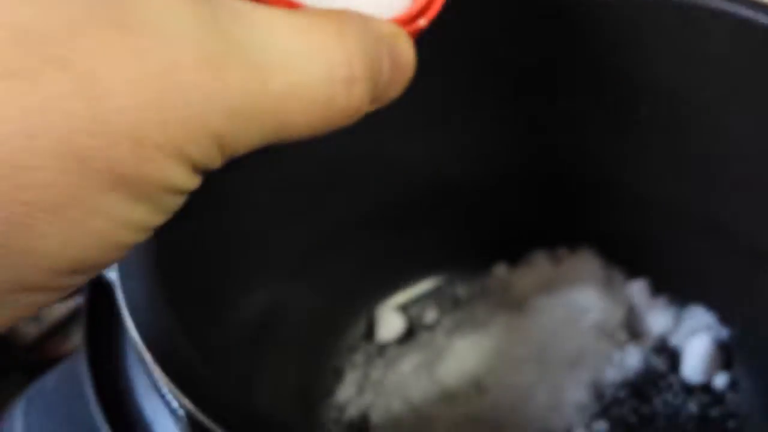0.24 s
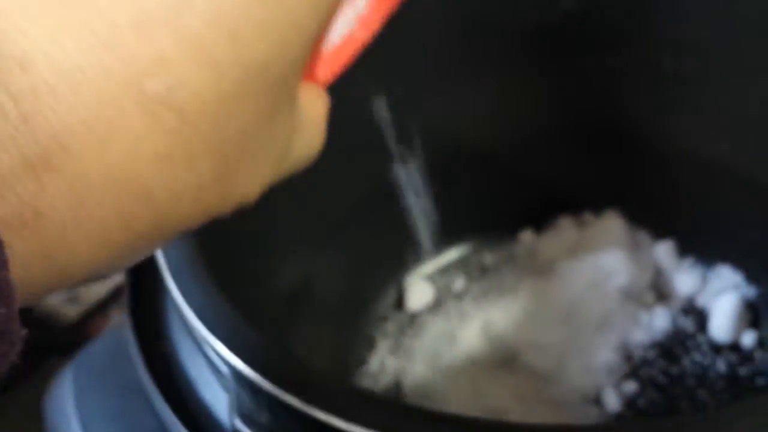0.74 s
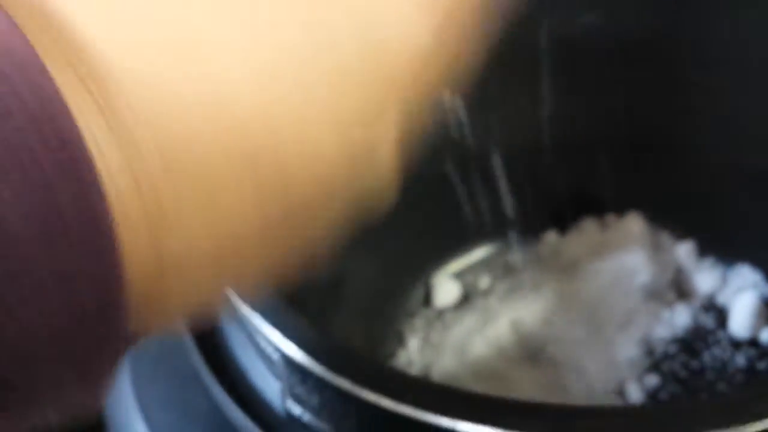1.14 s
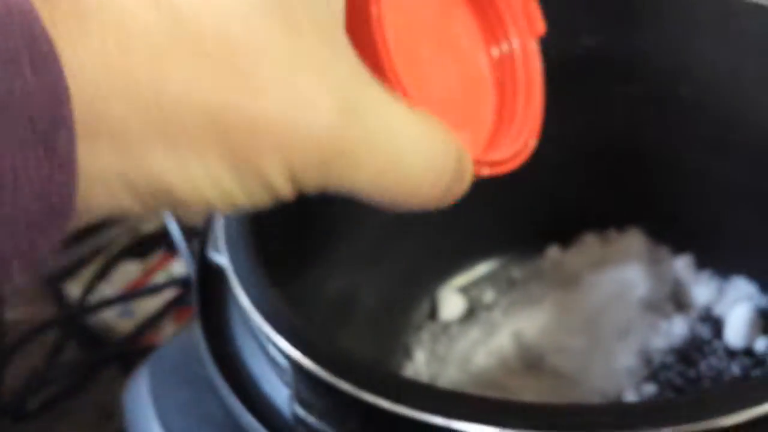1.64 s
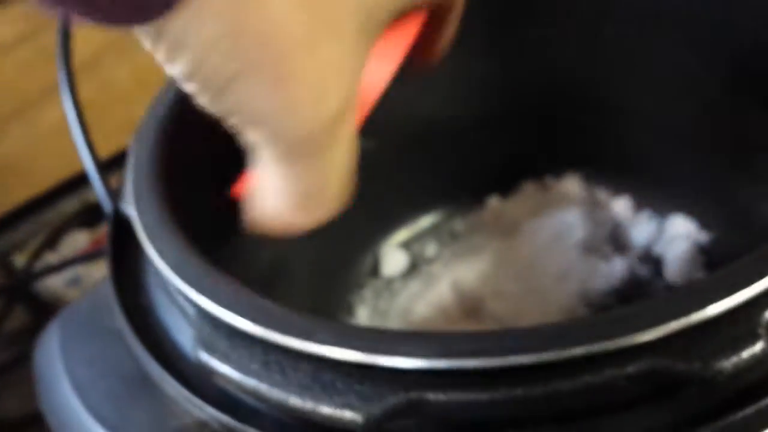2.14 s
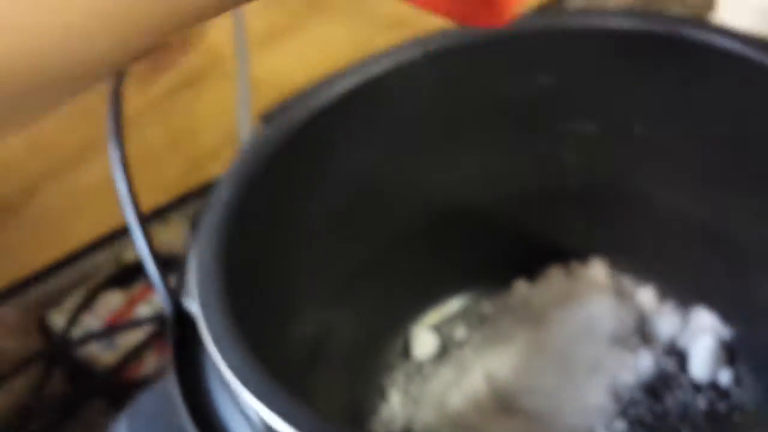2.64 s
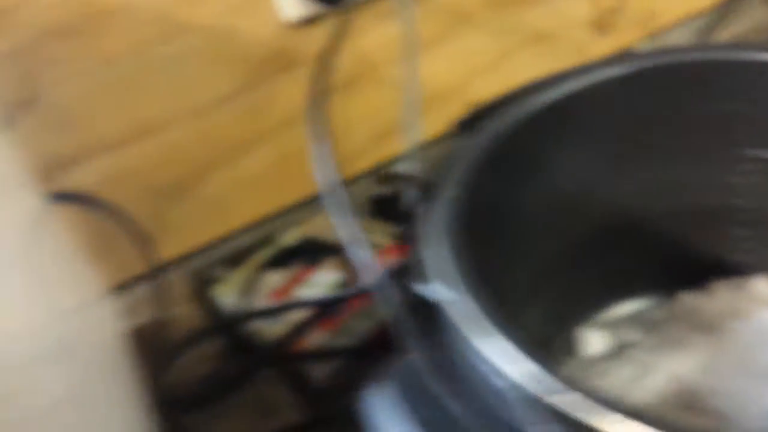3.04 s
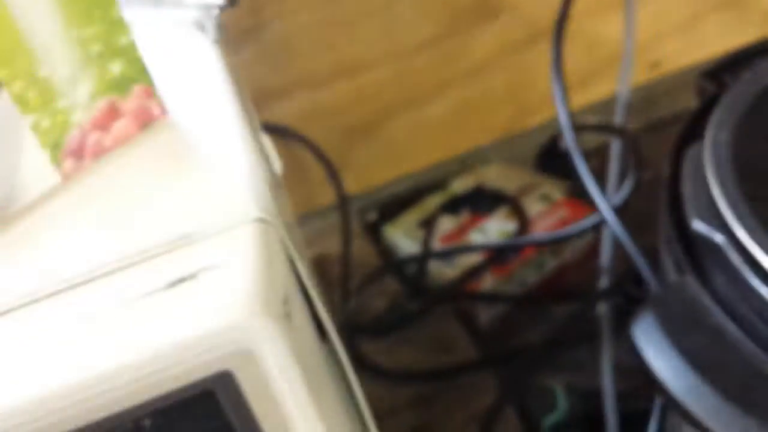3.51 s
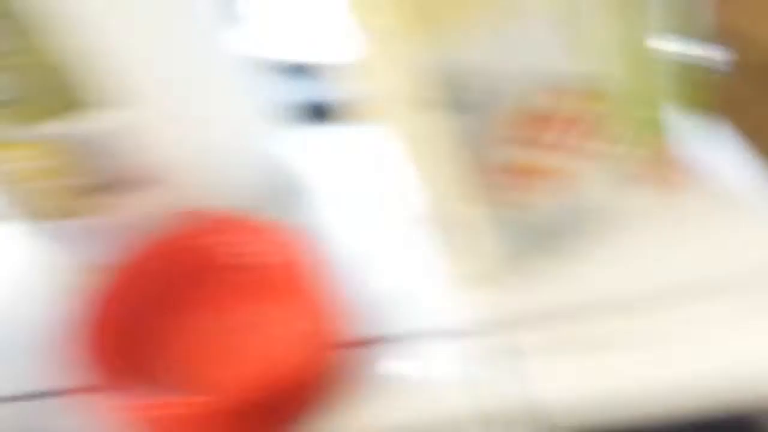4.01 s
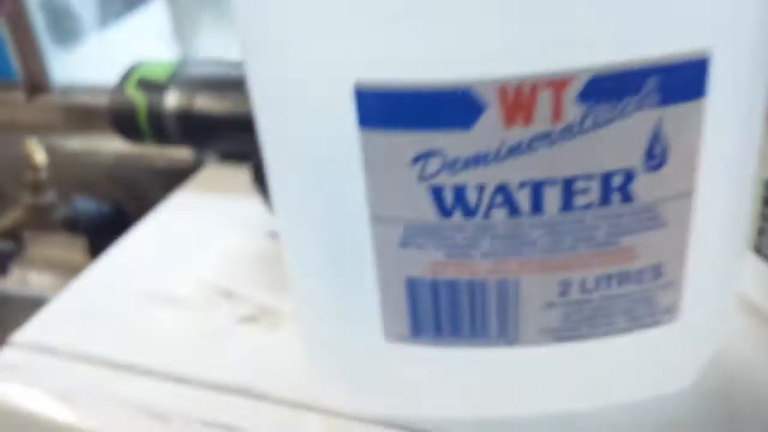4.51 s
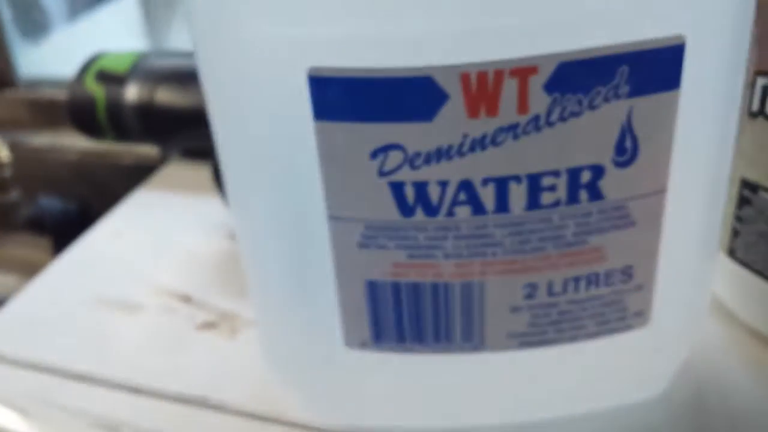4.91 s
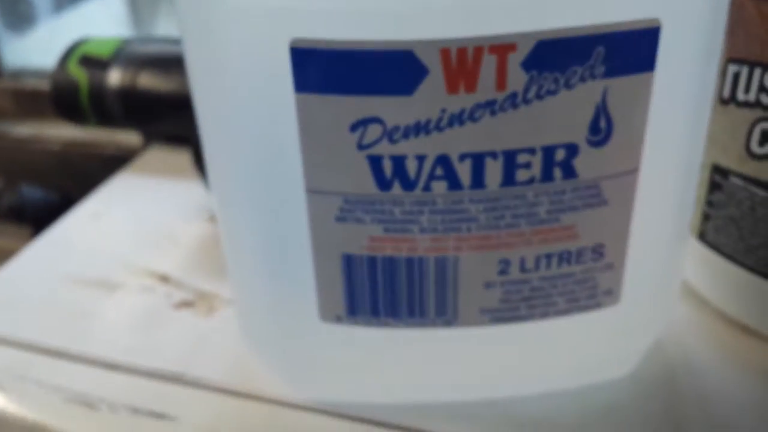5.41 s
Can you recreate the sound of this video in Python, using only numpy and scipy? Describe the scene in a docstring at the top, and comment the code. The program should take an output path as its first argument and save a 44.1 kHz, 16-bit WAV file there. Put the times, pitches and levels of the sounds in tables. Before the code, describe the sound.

Close, slightly rough hand-held stereo pickup in a small indoor room, with low rumble, faint hiss and a short diffuse echo. From 0 to 1.1 s dry granules slide off a plastic cap into a metal pot: crisp high ticks, mostly left, and short sandy swells, with a strong snap near 0.86 s. Finger rustle and a few light scrapes continue to 2 s. At 2.04, 2.25 and 2.43 s the cap raps the pot rim: very loud, hard cracks with rattling plastic and bright, short metallic ringing, plus dull bumps between. The background sinks almost to silence. At 3.33 s the light cap drops on a counter with a sharp clack, clattering in a quick cluster, then weaker rocking taps at 3.5-3.75 s over short woody low tones. From 4 s faint rubbing, a click at 4.6 s, then low handling thuds, rustle and firm snaps around 4.8-5.6 s as rumble returns.

```python
"""Granules tipped into a pot

A hand tips granules from a plastic cap into a metal pot, raps the cap three times on the rim and drops it on a
counter; fingers rustle, click and bump near a hand-held phone. The rumble sinks after the loud raps and slowly
returns. Raps and drop mix noise bursts with ringing modes; bumps are decaying sines with narrow noise; ticks and
rustle are filtered noise, over a short diffuse echo, rumble and hiss. All reaches two ports, left and right."""
import sys
import numpy as np
from scipy import signal
from scipy.fft import rfft, irfft
from scipy.io import wavfile
from scipy.ndimage import uniform_filter1d

SR = 44100
rng = np.random.default_rng(int(sys.argv[2]) if len(sys.argv) > 2 else 0)


def transcribe(signal):
    """Save signal, clipped to [-1, 1], as a 16-bit WAV file at the path in sys.argv[1]."""
    frames = np.atleast_2d(signal).T
    limited = np.clip(frames, -1, 1)
    pcm = np.round(limited * 32767).astype(np.int16)
    wavfile.write(sys.argv[1], SR, pcm)


N = 249606
T = np.arange(N) / SR  # s

# Cap on the rim: t/s, crack peak level/dB, rim ring level/dB and wall ring level/dB against the crack,
# freedom to ring/0-1, treble left minus right/dB
RAPS = [(2.041, 0.5, -12, -21, 0.71, 10), (2.252, -6, -14, -19.5, 0.44, 8),
        (2.43, -3, -13, -21.5, 0.81, 4.5)]
# Modes of the metal pot: f/Hz, relative level/dB, undamped t60/s
POT_MODES = [(269, -16, .55), (711, -14, .25), (983, -5, .2), (1206, -15, .35), (1254, -12, .2),
             (1497, -9, .22), (1890, -16, .33), (2223, -18, .3), (2680, -16, .3), (2950, -7, .13),
             (3255, -3, .24), (3530, -3, .33), (3632, -5, .35), (3770, -3, .2), (3898, -1, .16),
             (4050, -10, .25), (4315, -2, .17), (4405, -11, .24), (4790, -3, .2), (5082, -5, .13),
             (5355, -1, .18), (5530, -10, .3), (5700, -10, .3), (5911, -11, .3), (6028, -2, .17),
             (7250, -18, .25)]
# Colour of the rap's crack: f/Hz, relative level/dB per Hz
CRACK_COLOUR = [(180, -44.5), (300, -20), (523, -23.5), (975, -15), (1730, -20), (2480, -15), (2920, -16.5),
                (3220, 0.5), (4540, -10), (5900, -8.5), (6840, -18.5), (11400, -26), (15000, -49)]

# Cap landing and rocking: t/s, clatter peak level/dB, counter level/dB against the clatter, clatter tail t60/s
BOUNCES = [(3.324, -15.5, -14.5, 0.16), (3.328, -11.5, -24, 0.074), (3.335, -14, -31, 0.13),
           (3.343, -14.5, -20, 0.24), (3.351, -11, -20.5, 0.23), (3.36, -20, -16, 0.39),
           (3.518, -26.5, -9.5, 0.16), (3.526, -18, -17.5, 0.33), (3.539, -15, -28, 0.071),
           (3.555, -25, -20, 0.026), (3.613, -21, -11, 0.13), (3.647, -21, -14, 0.2),
           (3.739, -40.5, -2, 0.12)]
# Modes of the counter: f/Hz, relative level/dB, t60/s
COUNTER_MODES = [(114.4, -14, 0.33), (162.6, -3.5, 0.39), (311.6, -1, 0.35), (375, -10.5, 0.47),
                 (646, 3.5, 0.051), (912, 4.5, 0.053)]
# Colour of the clattering cap: f/Hz, relative level/dB per Hz
CAP_COLOUR = [(150, -17), (400, -3), (1200, 1.5), (2500, -2.5), (4200, 0.5), (5600, 4), (7200, -3.5),
              (10000, -14), (15000, -45.5)]
# Tail against the strike/dB, mean treble left minus right/dB and its spread/dB
BOUNCE_TAIL_DB, BOUNCE_LEFT_DB, BOUNCE_SCATTER_DB = -8.5, 4, 6

# Single ticks and snaps: t/s, main band peak level/dB, then dull, body and bright level/dB against the main band,
# treble left minus right/dB
TICKS = [(0.0671, -19, -5, -49, -8, 37), (0.086, -24, -19, -37, -7, 29), (0.1258, -23, -1.5, -32, -9, 24),
         (0.136, -36, 1, 11, -12, 16), (0.169, -17.5, -8, -28, -12, 32), (0.206, -24, -30, -22, -4, 24),
         (0.2179, -14.5, -15, -39, -5, 31), (0.486, -22, -14.5, -32, -13, 25),
         (0.5119, -17.5, -26, -17, -8, 18), (0.532, -22, -38, -25, -10, 4),
         (0.5412, -12.5, -35, -34, -17, 23), (0.548, -21, -31, -28, -29, 19),
         (0.5648, -15.5, -36, -31, -31, 18), (0.5805, -17, -38, -22, -4.5, 19),
         (0.6047, -16.5, -32, -30, -37, 16), (0.6244, -25.5, -16, -10, -12, 18),
         (0.6558, -19.5, -12, 2.5, 5, 9), (0.7, -30, -20, -16, -24, -2), (0.8306, -14.5, -13.5, -5, 2.5, 6),
         (0.856, -6, -24, -11.5, -12, 2), (0.95, -23.5, -28, -12, 1, 18), (0.973, -26, -22, -13, -32, 16),
         (0.9896, -21.5, -21, -5, -30, 10), (1.039, -28, -25, -20, -1, 9),
         (1.072, -26.5, -14.5, -19, -30, 22), (1.224, -26.5, -11, -2, -31, 6),
         (1.5264, -33.5, -29, -27, -23, 11), (2.612, -36, -17.5, -19.5, -32, 12),
         (2.786, -53.5, -15.5, -25, -17.5, -14), (3.3258, 2.5, -23, -6.5, -9.5, 0.5),
         (3.958, -47, -20.5, -13, -4, 2), (3.9867, -30.5, -25, -17, -28, -1), (4.5456, -39, -20, -16, 2, 3),
         (4.6, -18, -18.5, -6.5, 0, 3.5), (4.684, -41.5, -16, -17, -29, 3),
         (4.7873, -14.5, -13, -9, -47, 12), (4.8182, -24, 3.5, -7, -21, -1),
         (4.9674, -9, -6.5, -40, -38, 11), (5.0667, -25.5, -10, -16, -13, 14),
         (5.1368, -5, -8, -1, -17.5, 26), (5.311, -5, -12.5, -6.5, -14, 37),
         (5.497, -24, -11, -31, -15, 14), (5.587, -15, -8, -16, -20, 33), (5.5928, -24, -3.5, -23, -30, 27)]
TICK_TAIL_DB, TICK_T60_S = -13, 0.035  # tail against the click

# Colour of granules, fingers and ticks: f/Hz, relative level/dB per Hz
GRAIN_COLOUR = [(590, -19.5), (1000, -26.5), (1110, -23.5), (2260, -21), (3290, -16.5), (4310, -16),
                (5110, -6.5), (5410, -6.5), (5730, -6.5), (6710, -18), (11800, -30.5), (15000, -37)]
# Dull, body, main and bright bands: low edge f/Hz, high edge f/Hz
BANDS = [(800, 2900), (2300, 4700), (4000, 8500), (7500, 15000)]
# Swells of granules sliding off the cap: peak t/s, peak level/dB, rise/s, fall/s, dullness level/dB
GRANULES = [(.092, -50.5, 0.068, 0.053, 8), (.176, -38, 0.11, 0.084, -3.5), (.214, -29, 0.029, 0.024, -12),
            (.498, -45.5, 0.16, 0.056, -8), (.548, -27, 0.056, 0.064, -28), (.604, -39, 0.0068, 0.1, -13),
            (.66, -28.5, 0.0088, 0.013, -12), (.68, -46, 0.022, 0.25, -9), (.783, -35.5, 0.01, 0.033, -6.5),
            (.836, -33, 0.0082, 0.019, -10), (.892, -28, 0.0052, 0.017, -16),
            (.806, -34.5, 0.029, 0.0065, -13), (.87, -34.5, 0.039, 0.088, -14),
            (.98, -40.5, 0.23, 0.067, -11.5), (1.042, -43, 0.045, 0.014, -21),
            (1.068, -42.5, 0.026, 0.061, -14)]
# Swells of fingers rubbing cap and phone, and of the cap scuffing the counter: columns as for the granules
FINGERS = [(1.235, -47, .03, 0.052, -7), (1.399, -31.5, 0.014, 0.022, -16), (1.6, -45.5, 0.011, .2, -19),
           (1.691, -45, 0.085, 0.059, -2), (1.788, -41.5, 0.1, 0.043, -6.5), (1.9, -48.5, 0.02, 0.11, -11),
           (1.981, -42, 0.22, 0.026, -10.5), (3.58, -46.5, 0.11, 0.12, -1), (3.64, -41.5, 0.12, 0.05, -5.5),
           (3.982, -48, 0.0074, 0.063, -5), (4.005, -50.5, 0.03, 0.052, -7.5),
           (4.132, -52, 0.078, 0.03, -7.5), (4.349, -42.5, 0.12, 0.026, -7),
           (4.552, -57.5, 0.028, .023, -13.5), (4.694, -61, 0.024, 0.048, -3.5),
           (4.793, -30.5, .012, 0.024, -9), (4.856, -44, .11, .063, -7.5),
           (4.965, -37.5, 0.051, 0.058, -10), (5.068, -47, 0.0074, 0.03, -9),
           (5.145, -35, 0.041, 0.082, -2.5), (5.22, -31.5, 0.041, 0.036, -8.5),
           (5.284, -33.5, 0.1, 0.01, -9), (5.323, -38, 0.04, 0.091, -4), (5.503, -31, 0.0077, 0.09, -5),
           (5.53, -34.5, 0.074, 0.041, -5.5), (5.557, -34, 0.061, 0.023, -3.5), (5.6, -48, 0.049, 0.013, 4)]
# Dull and body level/dB on top of the dullness, bright level/dB, lean left minus right/dB before the side weights
GRANULE_MIX_DB, FINGER_MIX_DB = (-3, 3.5, -4.5, 11), (-3, 2, -10, 11)
# Faint rub under the swells, rising and falling, inaudible from the raps until after the drop: t/s, level/dB
RUB = [(0.0, -57), (0.27, -58), (0.41, -65), (1.0, -49.5), (1.5, -58.5), (2.0, -60), (2.042, -100),
       (3.8, -85), (4.06, -55.5), (4.19, -76), (4.452, -62), (4.76, -72), (4.9, -68), (5.4, -53),
       (5.58, -58), (5.66, -77)]
# Shares of the rub: dull, body and bright level/dB against the main band
RUB_SHARES_DB = (-9, -6, -2.5)
SWELL_CURVE, RUB_LEFT_DB = 1.02, 8  # 1 = straight slopes in dB; lean left minus right before the side weights

# Granules stirring the pot's air: start t/s, end t/s, centre f/Hz, width f/Hz, level/dB
STIRS = [(0.453, 0.55, 875, 120, -64), (0.585, 0.726, 233, 70, -60), (0.805, 0.88, 990, 100, -61),
         (0.822, 1.091, 241, 59, -49), (1.096, 1.3, 237, 69, -56), (1.372, 1.423, 920, 120, -56.5),
         (1.484, 1.527, 930, 120, -57.5), (1.616, 1.788, 920, 102, -58.5)]
# Dull bumps through the phone's case: t/s, peak level/dB, pitch f/Hz, t60/s
BUMPS = [(0.649, -31.5, 222, 0.089), (0.826, -46, 230, 0.22), (2.086, -24, 177.2, 0.14),
         (2.108, -33.5, 229, 0.15), (2.145, -31.5, 253, 0.088), (2.165, -33.5, 264, 0.071),
         (2.205, -31.5, 193, 0.12), (2.232, -63, 251, 0.42), (4.797, -32, 134, 0.14),
         (4.819, -42.5, 155, 0.41), (5.147, -30.5, 120, 0.36), (5.165, -41.5, 320, 0.16),
         (5.218, -38, 136.4, 0.43)]

# Background over time: t/s, rumble level/dB, hiss level/dB
ROOM = [(0.0, -58.5, -56.5), (0.47, -54, -63.5), (0.9, -49.5, -56), (1.4, -55.5, -59), (2.03, -58.5, -62.5),
        (2.24, -56, -81), (2.43, -63, -68), (2.63, -71.5, -75.5), (2.79, -77, -76.5), (3.3, -78, -75.5),
        (3.55, -70, -51.5), (3.962, -67.5, -75), (4.15, -62.5, -69.5), (4.701, -65.5, -64.5),
        (4.84, -45.5, -59.5), (4.96, -49.5, -55), (5.19, -56.5, -57), (5.66, -53, -58.5)]
# Colour of the rumble: f/Hz, relative level/dB per Hz
RUMBLE_COLOUR = [(15, -42), (25, -2.5), (81, 5), (181, -1), (229, -4), (330, -20), (461, -15), (545, -25),
                 (700, -21), (910, -48.5), (1540, -120)]
# Colour of the hiss: f/Hz, relative level/dB per Hz
HISS_COLOUR = [(120, -18.5), (200, -0.5), (320, 2), (494, -3.5), (1220, -6), (2510, -8.5), (4160, -8),
               (5550, -5.5), (10500, -12.5), (13700, -25), (15000, -43)]
AIR_DB = -12  # thin top of the hiss, below the hiss level
KITCHEN_T60_S, KITCHEN_DB = 0.3, -13

# Difference in colour between the ports: f/Hz, left minus right level/dB
PORTS = [(60, 1.94), (380, 0.1), (800, -2), (1500, 5.5), (2400, -1.4), (4300, 6), (8000, 0.5),
         (14700, -4.5)]
TOP_HZ = 14900


def undb(db):
    """Gain of a level in dB."""
    return 10 ** (np.asarray(db) / 20)


def unit(x):
    """Scale to an RMS of one."""
    return x / np.sqrt(np.mean(x ** 2))


def peak(x):
    """Scale to a peak of one."""
    return x / np.abs(x).max()


def colour(x, points):
    """Causal filter through (f/Hz, level/dB) points, by way of the cepstrum."""
    hz, db = np.transpose(points)
    f = np.maximum(np.fft.rfftfreq(4096, 1 / SR), 1)
    log_gain = np.interp(np.log(f), np.log(hz), db) * np.log(10) / 20
    cepstrum = irfft(log_gain)
    cepstrum[1:2048] *= 2  # folding it forward gives minimum phase
    cepstrum[2049:] = 0
    impulse = irfft(np.exp(rfft(cepstrum)))
    return signal.fftconvolve(x, impulse)[:len(x)]


def band(x, lo_hz, hi_hz):
    """Gentle band-pass."""
    return signal.sosfilt(signal.butter(2, [lo_hz, hi_hz], "band", fs=SR, output="sos"), x)


def walk(rate):
    """Random levels held 1 / rate s and slewed twice."""
    k = int(SR / rate)
    steps = np.repeat(rng.standard_normal(N // k + 1), k)
    return 1.6 * uniform_filter1d(uniform_filter1d(steps, k), k)[:N]


def fade(t, t60, rise=0.001):
    """Soft onset with time constant rise (s), then a 60 dB decay in t60 (s)."""
    return (1 - np.exp(-t / rise)) * np.exp(-np.log(1000) * t / t60)


def ring(t, modes, scatter_db, beats):
    """Decaying modes that waver, as close pairs do; high modes reach the ports out of step."""
    out = np.zeros((2, len(t)))
    for hz, db, t60 in modes:
        gain = undb(db + scatter_db * rng.standard_normal())
        turn = rng.random((2, 1)) * min(hz / 2500, 1)  # cycles
        points = rng.standard_normal(64) + 1j * rng.standard_normal(64) + 1.5
        waver = np.interp(t * beats, np.arange(64), points)  # beats = new points per second
        out += gain * np.imag(waver * np.exp(2j * np.pi * (hz * t + turn))) * fade(t, t60)
    return peak(out)


def pair(x, pan_db, lag):
    """One sound at two ports: the case shades only the treble, and the left port hears it lag samples late."""
    low = signal.sosfilt(signal.butter(1, 1200, fs=SR, output="sos"), x)
    treble = x - low
    left, right = undb(np.array([pan_db, -pan_db]) / 2) / np.cosh(pan_db * np.log(10) / 40)  # sum to two
    return np.array([np.roll(low + left * treble, lag), low + right * treble])


def add(out, s, x):
    """Mix a two-port sound in at s seconds."""
    i = int(s * SR)
    out[:, i:i + x.shape[1]] += x[:, :N - i]


def raps():
    """A 5 ms crack, rattling chatter of the cap, then the pot's rim and wall ring; a resting hand damps them."""
    out, t = np.zeros((2, N)), T[:30000]
    wall = [m for m in POT_MODES if m[0] < 2400]
    rim = [m for m in POT_MODES if m[0] > 2400]
    rim_lean = undb(np.array([[3.0], [-3.0]]))  # the rim's high modes favour the left port
    for s, db, rim_db, wall_db, free, pan_db in RAPS:
        rattle = undb(2.0 * np.repeat(rng.standard_normal(len(t) // 100), 100))
        contact = 1 / (1 + (t / .0055) ** 4)
        crack_level = contact * fade(t, 0.15)
        chatter_level = 0.11 * rattle * fade(t, 0.51 * free)
        burst = rng.standard_normal(len(t)) * (crack_level + chatter_level)
        crack = pair(peak(colour(burst, CRACK_COLOUR)), pan_db, lag=6)
        metal = undb(rim_db) * rim_lean * ring(t, rim, 0.93, 33.0)
        metal = metal + undb(wall_db) * ring(t, wall, 0.92, 20)
        damping = np.exp(-t * 30 * (1 - min(free, 1)))
        add(out, s, undb(db) * (crack + metal * damping))
    return out


def bounces():
    """The light cap clatters in gritty bursts; the counter answers with short low modes."""
    out, t = np.zeros((2, N)), T[:20000]
    for s, db, board_db, t60 in BOUNCES:
        grit = undb(3.0 * np.repeat(rng.standard_normal(len(t) // 40), 40))
        tail_level = undb(BOUNCE_TAIL_DB) * grit * fade(t, max(t60, .01))
        burst = rng.standard_normal(len(t)) * (fade(t, 0.007) + tail_level)
        burst[20] += 3.0  # the first contact is one hard pulse
        pan_db = BOUNCE_LEFT_DB + BOUNCE_SCATTER_DB * rng.standard_normal()
        clatter = pair(peak(colour(burst, CAP_COLOUR)), pan_db, lag=16)
        board = undb(board_db) * ring(t, COUNTER_MODES, 1.6, 45.6)
        add(out, s, undb(db) * (clatter + board))
    return out


def ticks():
    """A sharp click and a short noisy tail, split into bands with their own peaks."""
    out, t = np.zeros((2, N)), T[:6000]
    for s, db, dull_db, body_db, bright_db, pan_db in TICKS:
        level = fade(t, 0.0074, .0001) + undb(TICK_TAIL_DB) * fade(t, TICK_T60_S)
        burst = rng.standard_normal(len(t)) * level
        burst[8] += 4.0  # the first contact is one hard pulse
        burst = colour(burst, GRAIN_COLOUR)
        shares_db = (dull_db, body_db, 0, bright_db)
        tick = sum(undb(share) * peak(band(burst, *edges)) for share, edges in zip(shares_db, BANDS))
        add(out, s, undb(db) * pair(tick, pan_db, lag=5))
    return out


def rustle():
    """Dense grains of uneven size over a smooth rub, in four bands that share the grains."""
    hit, size = rng.random(N), rng.exponential(1, N)
    sign, rub, other = rng.standard_normal((3, N))
    struck = hit < 1800 / SR  # 1800 grains per second on average
    grains = unit(struck * sign * undb(3.3 * np.minimum(size, 3)))
    flicker = undb(1.5 * walk(60))
    out = []
    for side, smooth in ((0.99, rub), (-1.6, other)):  # side weights: left, right
        shared = np.roll(0.68 * grains + 0.2 * rub, int(2 * side))  # left a little late, right early
        x = colour(shared + 0.78 * smooth, GRAIN_COLOUR) * flicker
        out.append(sum(gain * unit(band(x, *edges)) for gain, edges in zip(swell_levels(side), BANDS)))
    return np.array(out)


def swell_levels(side):
    """Gain of the dull, body, main and bright bands at one port: the faint rub plus every swell, added as power."""
    s, db = np.transpose(RUB)
    dull_db, body_db, bright_db = RUB_SHARES_DB
    lean_db = side * RUB_LEFT_DB / 2
    shares = np.array([[dull_db], [body_db + lean_db], [lean_db], [bright_db]])
    power = undb(2 * (np.interp(T, s, db) + shares))
    for swells, (dull_db, body_db, bright_db, left_db) in ((GRANULES, GRANULE_MIX_DB), (FINGERS, FINGER_MIX_DB)):
        lean_db = side * left_db / 2
        for s, db, rise, fall, dullness_db in swells:
            near = slice(max(int((s - 3 * rise) * SR), 0), int((s + 3 * fall) * SR))
            t = T[near]
            away = np.where(t < s, (s - t) / rise, (t - s) / fall)
            shares = np.array([[dullness_db + dull_db], [dullness_db + body_db + lean_db], [lean_db], [bright_db]])
            power[:, near] += undb(2 * (db - 20 * away ** SWELL_CURVE + shares))  # rise and fall span 20 dB
    return np.sqrt(power)


def pot_air():
    """Falling granules stir the air in the pot in short spells of narrow noise, the same at both ports."""
    out = 0
    for t0, t1, hz, width, db in STIRS:
        on = uniform_filter1d(((T > t0) & (T < t1)) * 1., size=1000)
        breath = unit(band(rng.standard_normal(N), hz - width / 2, hz + width / 2))
        out = out + breath * on * undb(db)
    return out


def bumps():
    """Low, wobbling thuds, a sine with narrow noise around it, the same at both ports."""
    out, t = np.zeros((2, N)), T[:20000]
    for s, db, hz, t60 in BUMPS:
        shake = band(rng.standard_normal(len(t)), .6 * hz, 2.2 * hz)
        thud = (np.sin(2 * np.pi * hz * t) + .5 * unit(shake)) * fade(t, max(t60, .02), 0.0017)
        add(out, s, undb(db) * np.tile(peak(thud), (2, 1)))
    return out


def kitchen(x):
    """Diffuse echo: part of the bass alike at both ports, the rest unrelated; the treble dies first."""
    t = T[:30000]
    noise = rng.standard_normal((2, len(t)))
    tail = (band(noise[0], 88, 700) + band(noise, 760, 3000)) * fade(t, KITCHEN_T60_S, 0.0033)
    tail = tail + band(noise, 3000, 12000) * fade(t, 0.6 * KITCHEN_T60_S, 0.012)
    tail /= np.sqrt((tail ** 2).sum(1, keepdims=True))
    return signal.fftconvolve(np.tile(x.mean(0), (2, 1)), tail, axes=1)[:, :N]


def background():
    """Wandering rumble nearly alike at both ports, hiss unrelated in the treble."""
    s, rumble_db, hiss_db = np.transpose(ROOM)
    mid, side = (colour(rng.standard_normal(N), RUMBLE_COLOUR) for _ in range(2))
    rumble = mid + .17 * side * np.array([[1], [-1]])
    rumble = rumble / band(mid, 40, 130).std()  # its level counts the mid's 40-130 Hz
    rumble = rumble * undb(np.interp(T, s, rumble_db) + 2.0 * walk(4))
    shared, *own = rng.standard_normal((3, N))
    shared_low = band(shared, 100, 1000)
    hiss = np.array([colour(x - band(x, 100, 700) + shared_low, HISS_COLOUR) for x in own])
    air = band(band(np.array(own), 8000, 16000), 6000, 16000)
    hiss = hiss / band(hiss, 500, 2500).std() + undb(AIR_DB) * unit(air)  # its level counts 500-2500 Hz
    return rumble + hiss * undb(np.interp(T, s, hiss_db))


def scene():
    """Near sounds with their echo, then bumps, pot air and background without echo."""
    near = raps() + bounces() + ticks() + rustle()
    return near + undb(KITCHEN_DB) * kitchen(near) + bumps() + pot_air() + background()


def record(dry):
    """The two ports differ in colour and lose the deepest bass; peaks clip; the top is cut."""
    ports = [colour(x, [(hz, side * db / 2) for hz, db in PORTS]) for x, side in zip(dry, (1, -1))]
    ports = signal.sosfilt(signal.butter(2, 35, "high", fs=SR, output="sos"), ports)
    clipped = np.clip(ports, -1, 1)
    return signal.sosfilt(signal.ellip(8, .2, 70, TOP_HZ, fs=SR, output="sos"), clipped)


dry = scene()
out = record(dry)
transcribe(out)
```